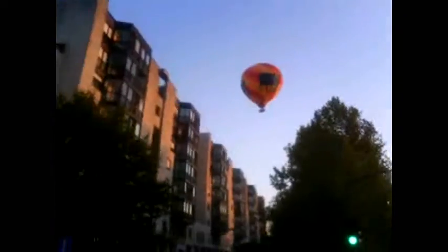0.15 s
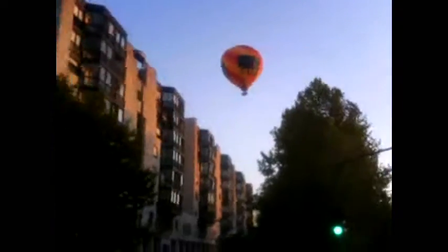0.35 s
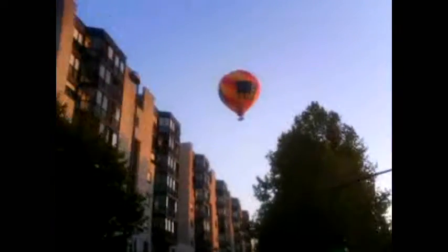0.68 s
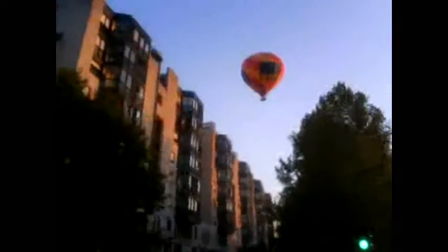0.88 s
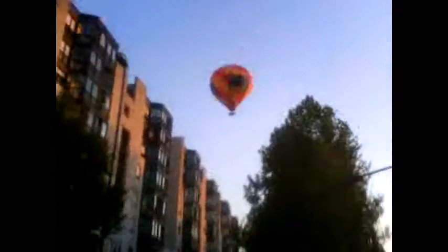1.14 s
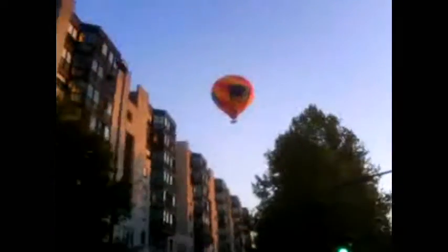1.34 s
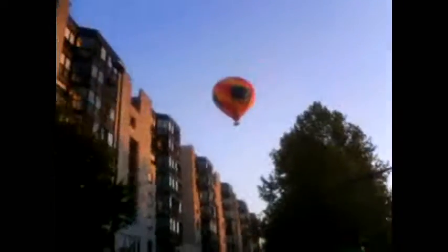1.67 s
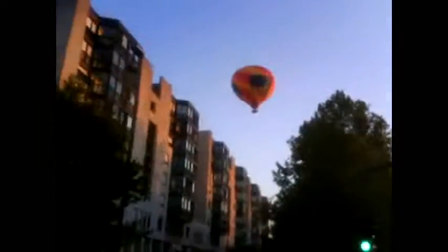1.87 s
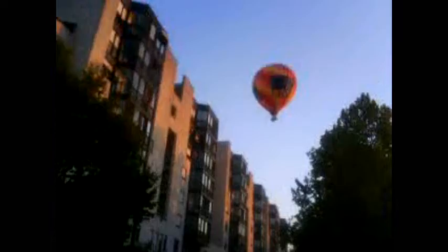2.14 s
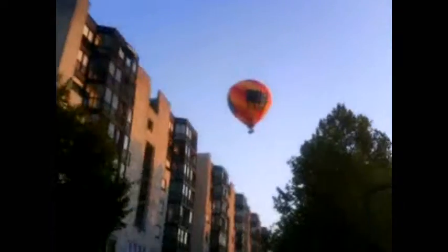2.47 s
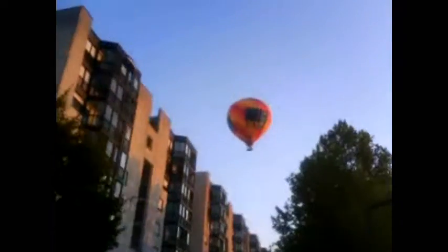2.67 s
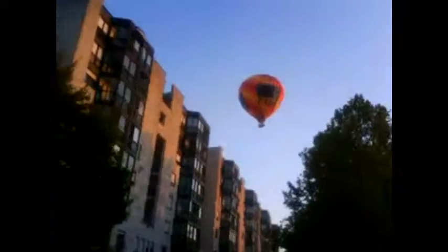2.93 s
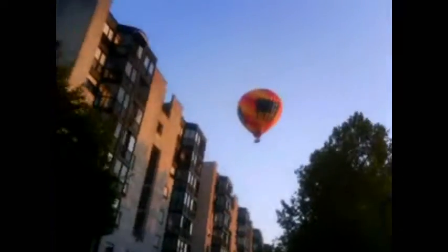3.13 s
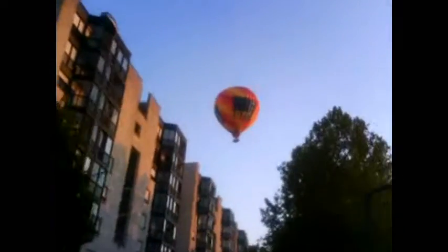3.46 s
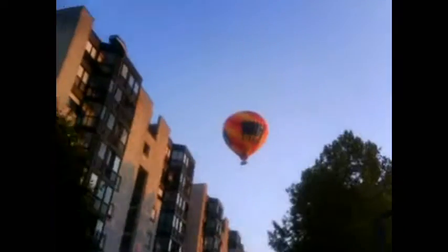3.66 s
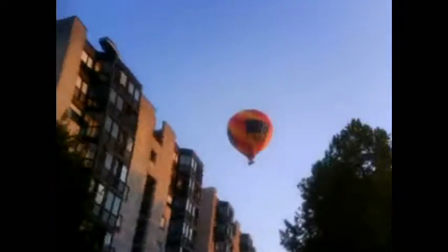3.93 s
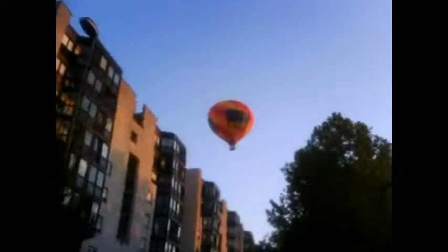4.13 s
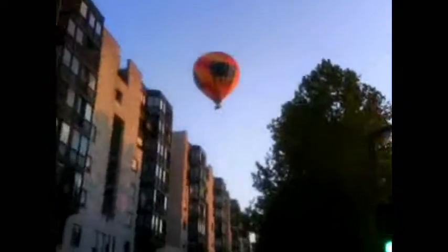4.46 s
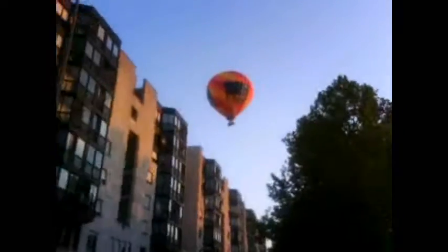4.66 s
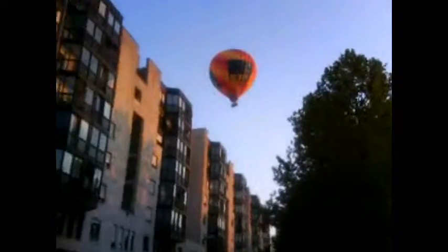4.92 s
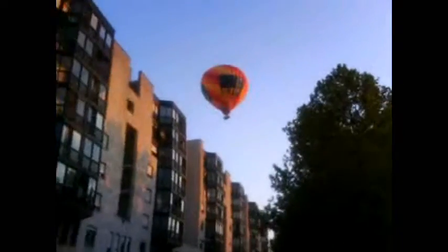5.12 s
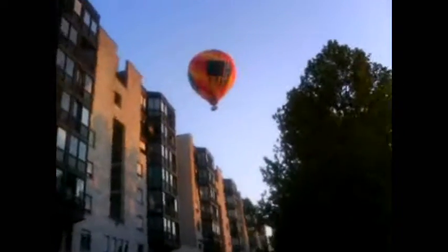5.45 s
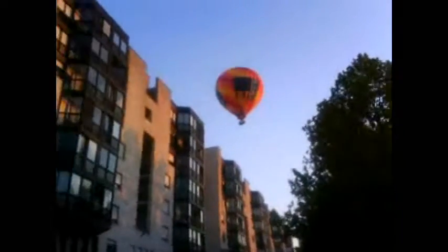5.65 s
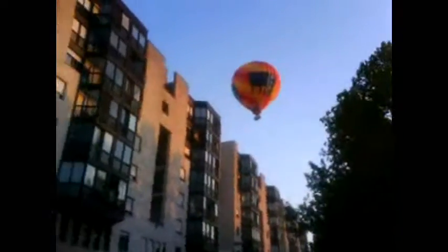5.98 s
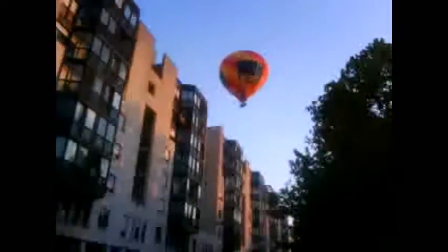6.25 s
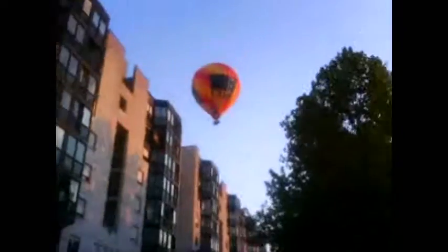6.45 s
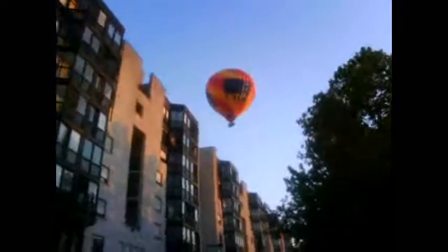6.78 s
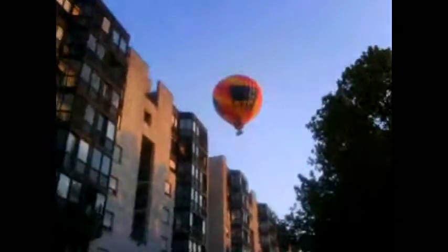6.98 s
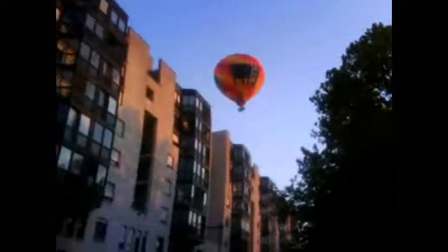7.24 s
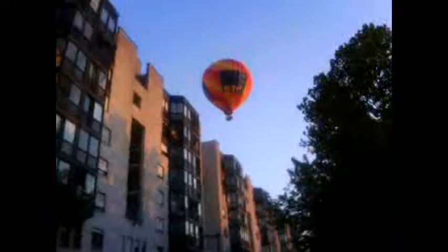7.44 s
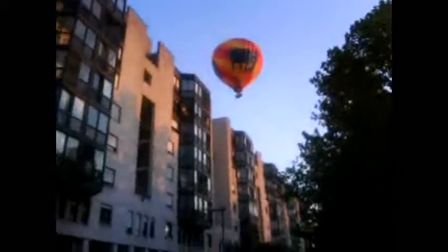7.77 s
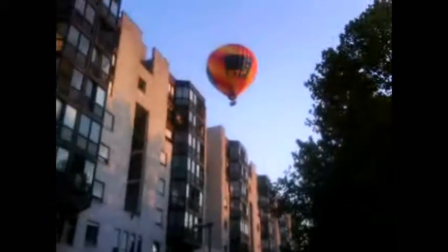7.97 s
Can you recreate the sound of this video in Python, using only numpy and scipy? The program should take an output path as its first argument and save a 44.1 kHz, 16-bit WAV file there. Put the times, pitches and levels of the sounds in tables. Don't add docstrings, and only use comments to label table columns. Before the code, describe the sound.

Steady rushing flame noise from a hot air balloon, muffled street boom, early gust thumps, sharp handling clicks, and faint breathy whistling late on.

```python
import sys
import numpy as np
from scipy import signal
from scipy.io import wavfile
from scipy.ndimage import uniform_filter1d, minimum_filter1d

SR = 44100
rng = np.random.default_rng(int(sys.argv[2]) if len(sys.argv) > 2 else 0)


def generate_wav(signal):
    frames = np.transpose(np.atleast_2d(signal))
    scaled = np.clip(frames, -1, 1) * 32767
    pcm = np.round(scaled).astype(np.int16)
    wavfile.write(sys.argv[1], SR, pcm)


def natural_amplitude(level_db):
    exponent = np.asarray(level_db, float) / 20
    return 10 ** exponent


N = 357233


def evened(x):
    return x / np.sqrt(np.mean(x ** 2) + 1e-20)


def columns(rows, t):
    s, *values = np.transpose(rows)
    return [np.interp(t, s, v) for v in values]


def bumps_db(rows, t):
    total_db = 0
    for s, length, db in rows:
        phase = np.pi * np.clip((t - s) / length, -.5, .5)
        total_db = total_db + db * np.cos(phase) ** 2
    return total_db


def wander(count, span):
    smooth = uniform_filter1d(rng.standard_normal(count), span)
    return evened(uniform_filter1d(smooth, span))


def turbulence(colour, size, patchy_db, flicker_db, flicker, pitch):
    hop = size // 4
    at = np.minimum(np.arange(N // hop + 5) * hop, N - 1)
    hz = np.fft.rfftfreq(size, 1 / SR)
    a, b, patches = rng.standard_normal((len(at), len(hz), 3)).T
    patches = uniform_filter1d(patches, 1 + 6000 // size, 0)
    patches = evened(uniform_filter1d(patches, 1 + 3000 // hop, 1))
    f, db = np.transpose(colour)
    shape_db = np.interp(np.log(hz[:, None] / pitch[at] + 1), np.log(f), db, left=-90, right=-90)
    field_db = shape_db + patchy_db * patches + flicker_db * flicker[at]
    noise = signal.istft((a + 1j * b) * natural_amplitude(field_db), nperseg=size, noverlap=size - hop)[1]
    return evened(noise[:N])


def resonate(x, hz, width):
    turn = np.exp(2j * np.pi * np.cumsum(hz) / SR)
    r = np.exp(-np.pi * width / SR)
    return 2 * (turn * signal.lfilter([1 - r], [1, -r], x / turn)).real


def blurred(hz, width):
    once = resonate(rng.standard_normal(len(hz)), hz, width)
    return evened(resonate(once, hz, width))


def swell(out, s, length, hz, width_hz, db):
    size = round(length * SR)
    at = round(s * SR) - size // 2
    out[at:at + size] += natural_amplitude(db) * np.hanning(size) * blurred(np.full(size, hz), width_hz)


# time in seconds, frequency in Hz, level in dB.
STREET_HUM = [(0, 944, -36), (.5, 878, -22), (1.0, 932, -23.5), (2.0, 887, -24.5), (4.6, 1043, -32),
              (5.3, 888, -40.5), (6.8, 607, -39.5), (7.5, 560, -13.5), (8.1, 598, -43)]


def street_hum(t):
    hz, db = columns(STREET_HUM, t)
    return natural_amplitude(db) * blurred(hz, 200)


# time in seconds, firing frequency in Hz, level in dB.
ENGINES = [
    [(.3, 116, -15.5), (.6, 112.3, -24.5), (.95, 111.6, -15), (1.25, 112, -46)],
    [(2.5, 65, -42.5), (2.7, 67.45, -17.5), (3.05, 69.1, -13), (3.55, 75.5, -22), (3.95, 82.5, -15.5),
     (4.6, 92.3, -36)],
    [(3.7, 55.7, -35), (4.0, 60, -35.5), (4.45, 64.6, -15), (4.75, 67.6, -22.5), (5.1, 69.2, -32.5),
     (7.0, 69.4, -31.5), (7.4, 72.6, -29.5), (8.1, 75.6, -19.5)],
]
OVERTONES_DB = [-12.5, -9, -4]


def engine(rows, over_db):
    t = np.arange(N) / SR
    hz, level_db = columns(rows, t)
    turns = 2 * np.pi * np.cumsum(hz * (1 + .011 * wander(N, 2500))) / SR
    overtones = np.sin(2 * turns) + 0.27 * np.sin(3 * turns)
    tone = np.sin(turns) + natural_amplitude(over_db) * overtones
    running = (t > rows[0][0]) * (t < rows[-1][0])
    return np.sqrt(2) * natural_amplitude(level_db) * tone * running


def eddy_dips():
    eddies = (rng.random(N) < 60 / SR) * np.minimum(rng.exponential(1, N), 2.5)
    u = np.arange(-300, 301) / SR
    dip = (1 - (u / 0.0014) ** 2 * 0.99) * np.exp(-.5 * (u / 0.0013) ** 2)
    dips = -signal.oaconvolve(eddies, dip, "same")
    return evened(dips - uniform_filter1d(dips, 900))


# time in seconds, level in dB, pitch factor.
STREET = [(0, -5, 0.85), (.35, -11.5, 0.95), (.6, -13.5, 0.76), (1.0, -20, 1.05), (1.4, -19, 0.98),
          (1.62, -18, 0.97), (2.1, -9.5, 0.9), (2.5, -9.5, 0.94), (3.0, -9, 0.98), (3.5, -11.5, 0.93),
          (4.05, -9.5, 0.97), (4.7, -14, 1.01), (5.1, -5.5, 0.97), (5.6, -10, 0.87), (6.1, -4, 1.13),
          (6.8, -10.5, 1.18), (7.5, -7, 1.05), (8.1, -15, 0.99)]
# frequency in Hz, density in dB.
BOOM_COLOUR = [(70, -39), (140, -7), (200, -0.5), (300, 1), (450, -6.5), (650, -16.5), (1200, -55.5)]
# centre in seconds, length in seconds, change in dB.
LULLS = [(.5, 0.048, 5), (1.0, 0.067, -2.5), (1.77, 0.047, 2.5), (2.25, 0.35, -4), (2.73, 0.36, -4.5),
         (3.37, 0.11, -2), (3.72, 0.12, 1.5), (3.87, .1, -0.5), (4.4, 0.34, -7.5), (5.28, 0.36, -6.5),
         (5.62, 0.14, -3.5), (5.96, .17, -11.5), (6.92, 0.3, -0.5), (7.83, 0.1, 0.5)]


def street_boom(t, dips):
    level_db, pitch = columns(STREET, t)
    level_db = level_db + bumps_db(LULLS, t)
    boom = turbulence(BOOM_COLOUR, size=1024, patchy_db=3.0, flicker_db=2.0, flicker=wander(N, 900), pitch=pitch)
    return natural_amplitude(level_db) * (boom + 0.18 * dips)


# time in seconds, strength in dB.
WIND = [(0, -3.5), (.25, -18), (.6, -11.5), (1.1, -20), (1.55, -15.5), (1.8, -22), (2.15, -17.5),
        (2.55, -26), (2.8, -20.5), (3.3, -26), (3.8, -19.5), (4.4, -19), (4.9, -17.5), (5.3, -19),
        (5.65, -22), (6.3, -18.5), (7.25, -13), (8.1, -23)]
# frequency in Hz, density in dB.
BUFFET_COLOUR = [(15, -25), (30, -14.5), (60, -2), (110, -4), (160, -5.5), (260, -17), (500, -56)]


def wind(t, dips):
    strength_db, = columns(WIND, t)
    _, pitch = columns(STREET, t)
    buffet = turbulence(BUFFET_COLOUR, size=2048, patchy_db=-1.3, flicker_db=-0.5,
                        flicker=wander(N, 2000), pitch=1 / pitch)
    return natural_amplitude(strength_db) * (buffet + 0.36 * dips)


def air():
    t, dips = np.arange(N) / SR, eddy_dips()
    return street_hum(t) + street_boom(t, dips) + wind(t, dips)


# centre in seconds, length in seconds, frequency in Hz, level in dB.
THUMPS = [
    (.52, 0.13, 210, -20.5),
    (0.586, 0.049, 109, -9),
    (0.659, .04, 128, -23),
    (0.686, 0.038, 119, -11.5),
    (0.772, 0.096, 166, -11.5),
    (0.942, 0.058, 100, -13),
    (1.121, 0.15, 165, -8),
    (1.599, .14, 127, -11),
]


def gust_thumps():
    out = np.zeros(N)
    for s, length, hz, db in THUMPS:
        swell(out, s, length, hz, width_hz=110, db=db)
    return out


# start in seconds, peak in dB, ring in Hz, decay by 60 dB in seconds,
# second contact in dB against the first.
KNOCKS = [(1.719, 1, 3000, 0.0035, -15), (1.7222, 7, 3560, 0.0029, -24), (1.868, 15, 3510, 0.0019, -18),
          (1.887, 2, 2510, 0.0079, -11), (1.9037, 14.5, 3170, 0.0043, -5.5),
          (1.918, -10, 4680, 0.0073, -13), (1.9262, 13.5, 865, 0.0033, -20.5),
          (2.412, 1.5, 3660, 0.0033, -15), (2.426, 5.5, 363, .012, -22), (2.4993, -2, 2730, 0.0029, -11),
          (2.5195, 4, 3980, 0.0034, -6), (3.43, 2, 2540, 0.0048, -2), (4.0328, 2.5, 2950, 0.0032, -6.5),
          (4.154, 11.5, 2600, 0.006, -4), (4.201, 0, 2880, .007, -5), (7.0238, 5, 330, .012, -25),
          (7.136, -5.5, 302, 0.007, -29)]


def knocks():
    out, u = np.zeros(N + 900), np.arange(800) / SR
    cracks = rng.standard_normal((len(KNOCKS), 800))
    for (s, db, hz, t60, again_db), crack in zip(KNOCKS, cracks):
        curve, width = np.full(800, hz), 1.3 * hz
        crack = evened(resonate(resonate(crack, curve, width), curve, width))
        onset = np.minimum(u * hz * 8, 1)
        ring = (np.sin(2 * np.pi * hz * u) + .55 * crack) * natural_amplitude(-60 * u / t60) * onset
        ring = -ring / abs(ring).max() * natural_amplitude(db)
        at = round(s * SR)
        out[at:at + 800] += ring
        out[at + 26:at + 826] += natural_amplitude(again_db) * ring
    return out[:N]


# centre in
# seconds, length in seconds, frequency in Hz, width as a share of that frequency, level in dB.
SURGES = [(.268, 0.076, 1000, 0.37, -14.5), (0.998, .08, 1290, 1.7, -15.5), (1.33, 1.0, 529, 0.1, -22),
          (1.384, .4, 1770, 1.1, -27), (1.798, .14, 1190, 1.9, -17), (1.832, .07, 4000, .06, -27),
          (1.913, 0.11, 4140, 0.65, -20), (3.711, 0.11, 2680, .48, -11), (4.184, 0.055, 3300, 0.8, -22),
          (4.9, 0.17, 1510, .8, -22), (5.273, 0.29, 1960, 0.52, -16), (5.924, 0.11, 1620, 1.1, -14),
          (6.075, .07, 480, 0.81, -10), (6.251, .025, 1200, 0.59, -17.5), (7.072, .05, 500, .8, -12)]


def noise_surges():
    out = np.zeros(N)
    for s, length, hz, share, db in SURGES:
        swell(out, s, length, hz, share * hz, db)
    return out


# time in seconds, lower frequency in Hz, lower level in dB, upper level in dB.
WHISTLE = [(3.5, 2120, -54, -33), (4.3, 2060, -35.5, -18), (4.6, 2025, -33, -22.5), (5.0, 2060, -28.5, -41),
           (5.7, 2090, -28.5, -43), (6.8, 2084, -19.5, -28), (7.3, 2176, -22.5, -28),
           (7.7, 2220, -23.5, -27), (8.1, 2240, -18, -19.5)]


def nozzle_whistles(t):
    low_hz, low_db, high_db = columns(WHISTLE, t)
    high_hz = low_hz * np.interp(t, [4.8, 5.8], [1.37, 1.25])
    return natural_amplitude(low_db) * blurred(low_hz, 270) + natural_amplitude(high_db) * blurred(high_hz, 320)


# time in seconds, level in dB.
SHOULDER = [(5.6, -52), (6.5, -30.5), (7.6, -26), (8.1, -26.5)]
SHOULDER_HZ = [3000, 4600]


def jet_shoulder(t):
    level_db, = columns(SHOULDER, t)
    band = signal.firwin(201, SHOULDER_HZ, pass_zero=False, fs=SR)
    return natural_amplitude(level_db) * evened(signal.oaconvolve(rng.standard_normal(len(t)), band, "same"))


# time in seconds, power in dB, brightness in dB, roar pitch factor.
FLAME = [(0, -17.5, 0, 1.33), (.45, -22, 0, 0.77), (1.0, -22, 2, 1), (1.13, -23, 1.5, 0.88),
         (1.3, -16.5, 1, 0.92), (1.62, -22.5, 1, 0.81), (1.8, -17, -0.5, 1), (2.1, -16.5, 2, 1),
         (2.3, -20.5, 1.5, 1), (2.62, -16, 0, 0.76), (3.0, -20.5, 0.5, 1.17), (3.4, -20.5, 0.5, 0.98),
         (4.05, -16, 3, 0.9), (4.5, -15, 2, 1.1), (5.2, -18, 0.5, 1.22), (5.9, -16.5, 1.5, .95),
         (6.8, -21, -1.5, 0.83), (8.1, -23, 3, 0.87)]
# centre in seconds, length in seconds, change in dB.
GULPS = [(.35, .15, -3), (2.85, 0.24, -3.5), (3.72, 0.17, 3.5), (3.87, 0.14, -0.5), (4.68, 0.34, -3.5),
         (5.0, 0.12, 0.5), (5.62, 0.44, -2), (6.38, 0.17, 6), (6.52, .12, -1), (7.25, 0.21, 0.5),
         (7.62, .15, 0)]
# frequency in Hz, density in dB.
ROAR_COLOUR = [(250, -48), (500, 1.5), (700, 1.5), (950, 2), (1300, 0), (1800, -4), (3000, -26.5)]
HISS_COLOUR = [(800, -32.5), (1400, -2), (2100, 2.5), (2700, 1), (3300, -5), (4200, -16.5), (6000, -33.5)]
FIZZ_COLOUR = [(2200, -39), (3300, -5), (3800, -2.5), (4500, -8), (5300, -10.5), (6800, -17), (8000, -32)]


def burner():
    t = np.arange(N) / SR
    power_db, bright_db, pitch = columns(FLAME, t)
    hiss_db = power_db + bumps_db(GULPS, t)
    roar_db = hiss_db + 3 - 0.76 * bright_db
    fizz_db = hiss_db - 9 + 1.4 * bright_db
    flutter = evened(wander(N, 1800) + .5 * wander(N, 400))
    steady = np.ones(N)
    roar = turbulence(ROAR_COLOUR, size=512, patchy_db=-0.56, flicker_db=0.7, flicker=flutter, pitch=pitch)
    hiss = turbulence(HISS_COLOUR, size=512, patchy_db=0.35, flicker_db=0.63, flicker=flutter, pitch=steady)
    fizz = turbulence(FIZZ_COLOUR, size=512, patchy_db=1.33, flicker_db=0.3, flicker=flutter, pitch=steady)
    flame = natural_amplitude(roar_db) * roar + natural_amplitude(hiss_db) * hiss + natural_amplitude(fizz_db) * fizz
    on = t > WHISTLE[0][0]
    flame[on] += nozzle_whistles(t[on]) + jet_shoulder(t[on])
    return flame


def scene():
    engines = sum(map(engine, ENGINES, OVERTONES_DB))
    return (air() + engines + gust_thumps() + knocks() + noise_surges() + burner())[None]


# frequency in Hz, threshold in dB against the local level.
THRIFT = [(3600, -30), (4400, -12), (4700, -5), (6500, -2.5), (7150, 0), (7300, 6), (8000, 6)]
# frequency in Hz, gain in dB.
EDGE = [(7080, 0), (7220, -8), (7900, -6.5), (8050, -77)]


def thin_treble(x):
    frame = dict(nperseg=4096, noverlap=2048, window="cosine")
    hz, t, z = signal.stft(x, SR, **frame)
    level = np.sqrt(uniform_filter1d(abs(z) ** 2, size=41, axis=0) + 1e-20)
    luck = uniform_filter1d(rng.standard_normal(z.shape), size=11, axis=0)
    luck = evened(uniform_filter1d(luck, size=2, axis=1))
    threshold_db = np.interp(hz, *np.transpose(THRIFT))[:, None]
    step = level * natural_amplitude(threshold_db + 7 * luck)
    sharp = abs(t[:, None] - np.transpose(KNOCKS)[0]).min(axis=1) < 2048 / SR
    kept = (abs(z) > step) | sharp & (hz < EDGE[0][0])[:, None]
    z = z * kept * natural_amplitude(np.interp(hz, *np.transpose(EDGE)))[:, None]
    x = signal.istft(z, SR, **frame)[1][:N]
    mirror = x * np.cos(2 * np.pi * 16000 * np.arange(N) / SR)
    band = signal.firwin(801, [9000, 15750], pass_zero=False, fs=SR)
    return x + natural_amplitude(-50.0) * signal.oaconvolve(mirror, band, "same")


def held_db(x, fall_db):
    fall = np.arange(N) * fall_db / SR
    peak_db = np.maximum.accumulate(20 * np.log10(abs(x) + 1e-9) + fall) - fall
    return np.maximum(peak_db, 0)


def band_limit(x):
    return signal.sosfilt(signal.butter(12, 15800, fs=SR, output="sos"), x)


def record(dry):
    x = natural_amplitude(2.0) * signal.oaconvolve(dry[0], signal.firwin(201, 8200, fs=SR), "same")
    keep = np.exp(-1 / (.06 * SR))
    rider_db = 0.87 * signal.lfilter([1 - keep], [1, -keep], held_db(x, fall_db=80.5))
    x = x / natural_amplitude(rider_db)
    ahead_db = -minimum_filter1d(-held_db(x, fall_db=152.0), size=81, origin=-40)
    x = x / natural_amplitude(uniform_filter1d(ahead_db, size=61, origin=30))
    x = np.clip(natural_amplitude(-.07) * thin_treble(x), -1, 1)
    return band_limit(x[None])


dry = scene()
out = record(dry)
generate_wav(out)
```